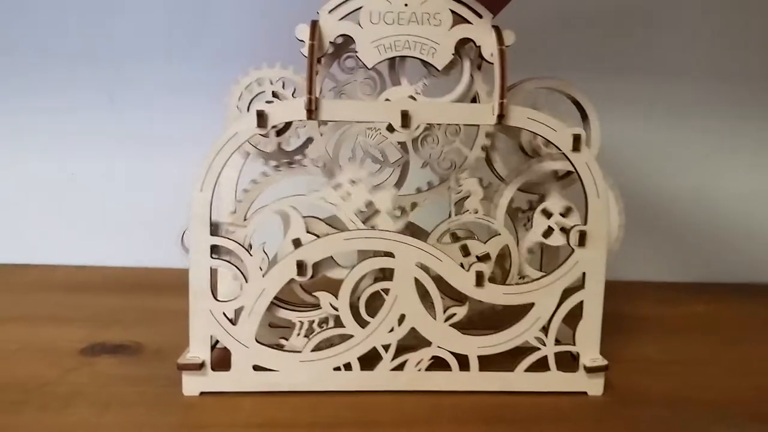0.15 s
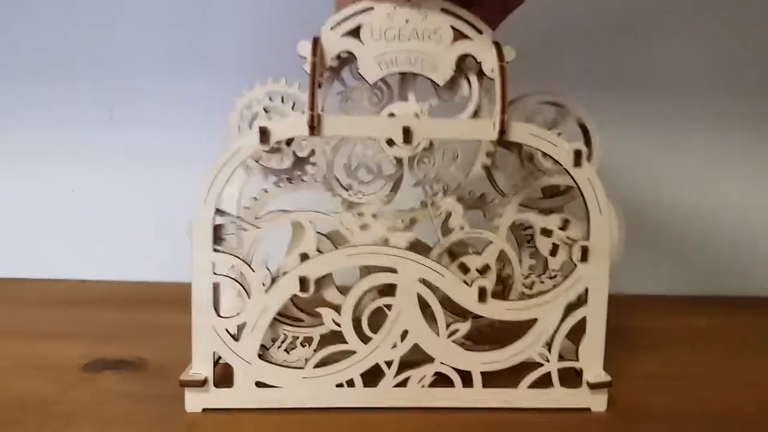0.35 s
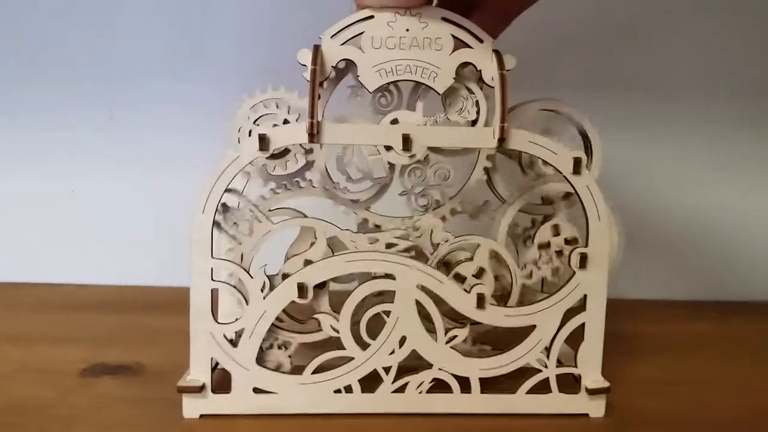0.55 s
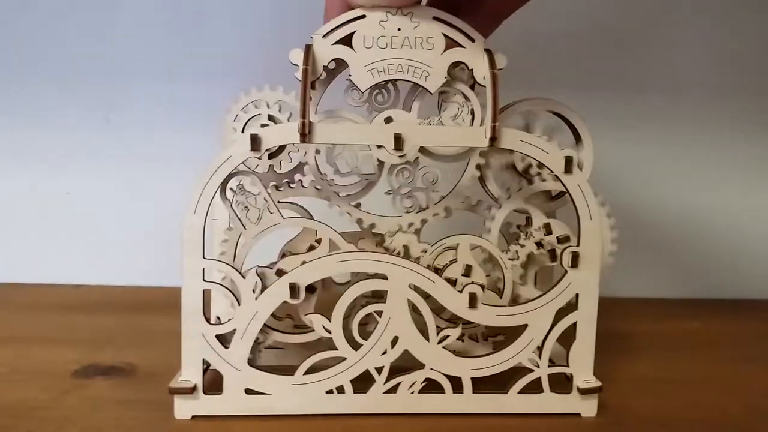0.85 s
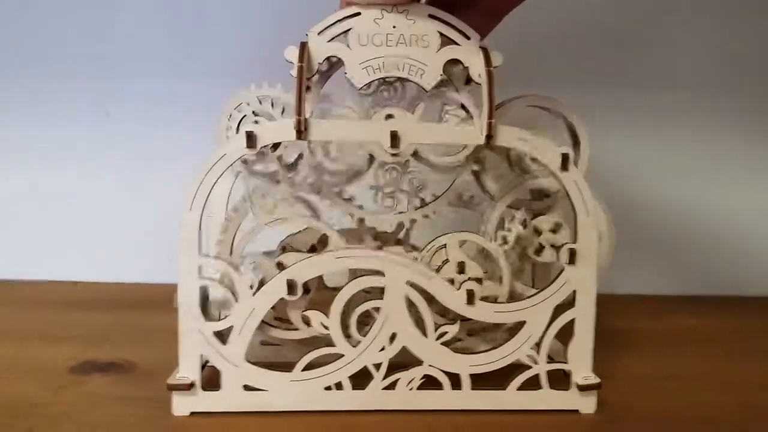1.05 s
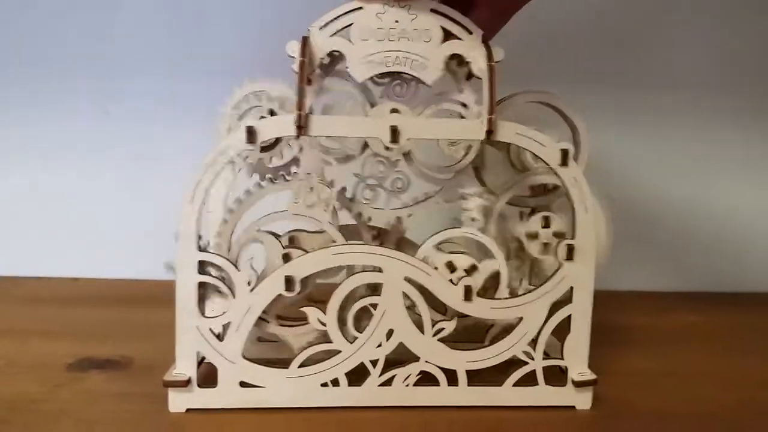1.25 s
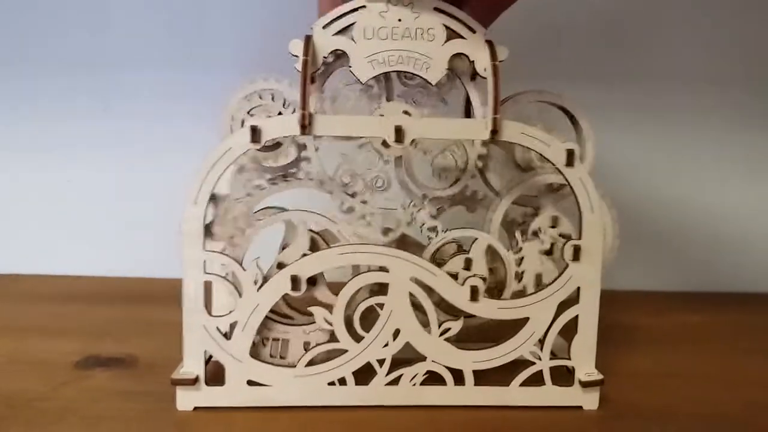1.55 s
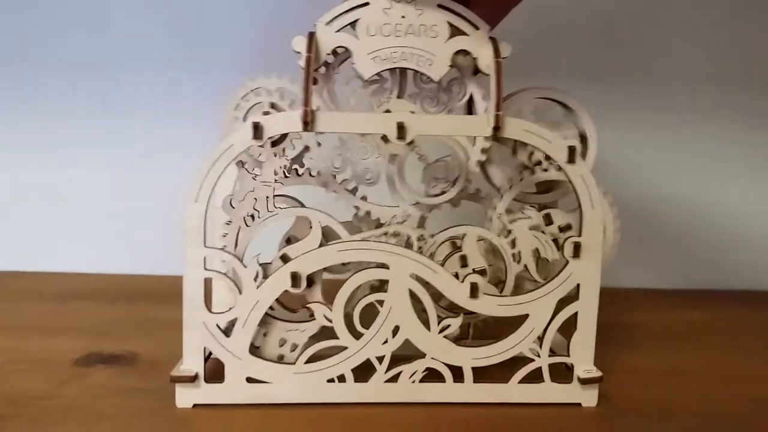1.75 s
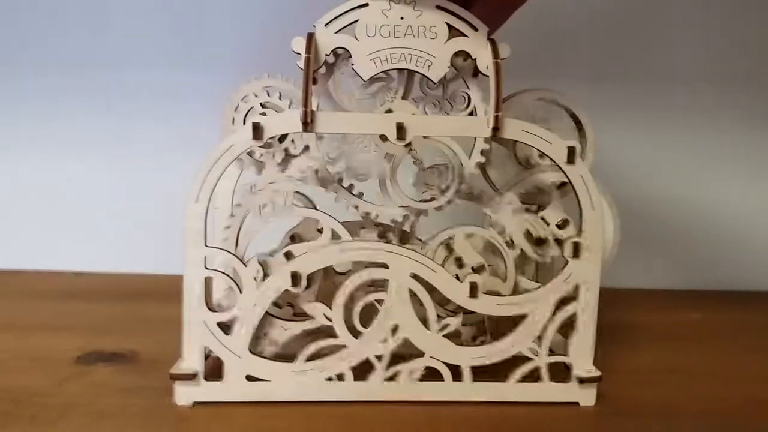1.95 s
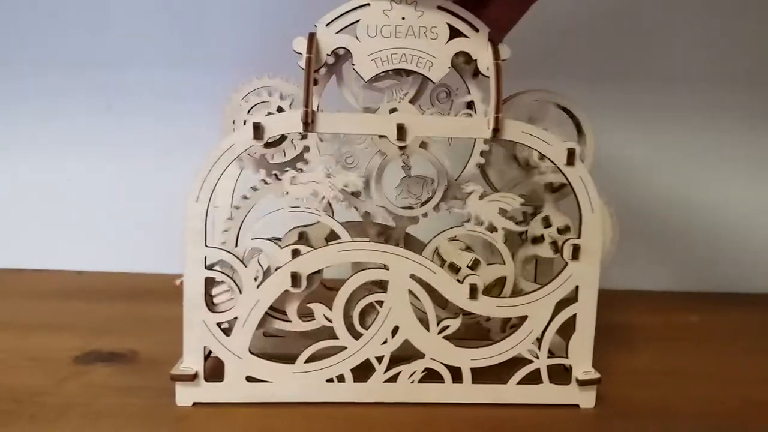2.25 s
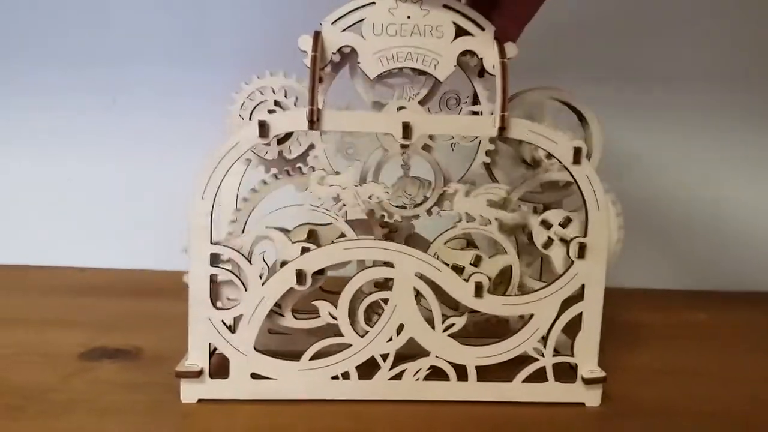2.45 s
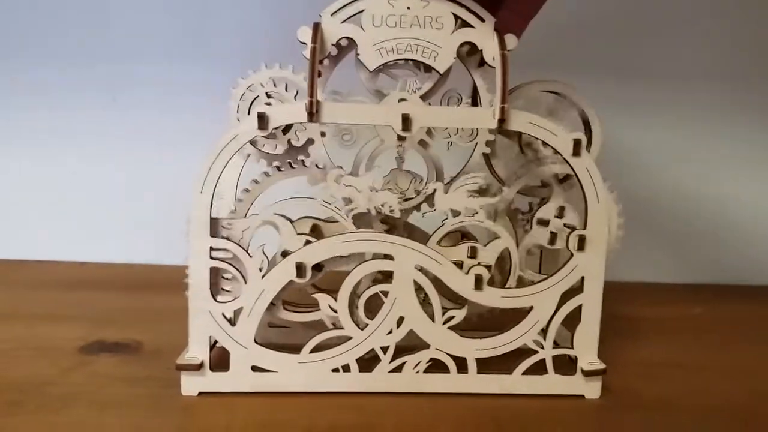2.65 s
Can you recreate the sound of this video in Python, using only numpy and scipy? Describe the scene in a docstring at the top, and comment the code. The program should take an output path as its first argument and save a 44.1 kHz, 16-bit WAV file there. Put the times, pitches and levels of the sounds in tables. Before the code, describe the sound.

A small wooden gear mechanism turns indoors, ticking, scraping and knocking over a faint low hum.

```python
"""Hand-turned wooden gears

Plywood gears of a table-top model turn in a quiet room. Teeth tick as bursts of coloured noise; rubbing and
knocks ring the resonances of the thin frame; an axle squeaks as short sine notes. Dull decaying tones bump
the table, and distant machinery hums as three fuzzy tones over the shaped noise of two unequal microphones."""
import sys
import numpy as np
from scipy import signal
from scipy.fft import irfft
from scipy.io import wavfile
from scipy.ndimage import uniform_filter1d

SR = 44100
rng = np.random.default_rng(int(sys.argv[2]) if len(sys.argv) > 2 else 0)


def generate_wav(signal):
    """Clip the signal to [-1, 1] and save it as 16-bit WAV at the path in sys.argv[1]."""
    frames = np.transpose(np.atleast_2d(signal))
    scaled = np.clip(frames, -1, 1) * 32767
    pcm = np.round(scaled).astype(np.int16)
    wavfile.write(sys.argv[1], SR, pcm)


N = 123039  # length in samples
LOW_RIGHT_DB = -18.5  # hum and thumps are this much weaker on the right


def gain_of(db):
    """Turn decibels into a factor for the waveform."""
    return 10 ** (np.asarray(db) / 20)


def evened(x):
    """Scale a signal to an average (RMS) strength of 1."""
    return x / np.sqrt(np.mean(x ** 2) + 1e-20)


def over_pitch(table, hz):
    """Read the columns of a table at the given frequencies, on a logarithmic scale."""
    table_hz, *columns = np.transpose(table)
    return np.array([np.interp(np.log(hz + 1), np.log(table_hz + 1), c) for c in columns])


def over_time(table):
    """Glide through the columns of a table over time."""
    seconds, *columns = np.transpose(table)
    return np.array([np.interp(np.arange(N) / SR, seconds, c) for c in columns])


def resonate(x, hz, width):
    """A resonance of gain 1 whose pitch may move: shift it to 0 Hz, smooth, and shift it back."""
    turn = np.exp(2j * np.pi * np.cumsum(hz * np.ones(len(x))) / SR)
    keep = np.exp(-np.pi * width / SR)
    return 2 * (turn * signal.lfilter([1 - keep], [1, -keep], x / turn)).real


# Microphone hiss. Each row: frequency in Hz, left level in dB per Hz, right level in dB per Hz.
HISS_LEVELS = [(26.5, -90, -105), (45.4, -54, -72.5), (94.5, -63, -69), (186, -72.5, -79.5),
               (302, -82.5, -87.5), (775, -97, -95.5), (1130, -91, -101.8), (2100, -99.5, -105.3),
               (2580, -102.9, -108.3), (3370, -95, -107.1), (4104, -82.5, -107.4), (5074, -97.5, -114.5),
               (5700, -112.6, -122.9), (8300, -123.3, -125.3), (10300, -115.3, -117.4),
               (14900, -110.2, -110.9)]
# How alike the two sides are. Each row: frequency in Hz, likeness from 0 (unrelated) to 1 (the same).
HISS_LIKENESS = [(60, 1), (150, 0.54), (500, 0.1), (1200, 0.013)]


def hiss():
    """Steady noise with its own spectrum on each side, shared between the sides only in the bass."""
    frames, hz = N // 512 + 5, np.fft.rfftfreq(2048, 1 / SR)
    a, b, c, d = rng.standard_normal((frames, 1025, 4)).T
    left, other = a + 1j * b, c + 1j * d
    same = np.clip(over_pitch(HISS_LIKENESS, hz)[0], -1, 1)[:, None]
    right = same * left + np.sqrt(1 - same ** 2) * other
    spectrum = np.array([left, right]) * gain_of(over_pitch(HISS_LEVELS, hz)[:, :, None])
    spectrum *= np.sqrt(SR / 2048)  # from level per Hz to level per frequency bin
    return signal.istft(spectrum, nperseg=2048, noverlap=1536)[1][:, :N]


# Machinery hum. Each row: time in seconds, pitch of the low tone in Hz, then the levels of the low,
# middle and top tones in dB.
HUM_COURSE = [(0, 69, -47, -35.5, -52), (.22, 70, -40.5, -54.5, -53.5), (.4, 69.5, -56, -73, -53),
              (.56, 59.63, -37, -59, -43.5), (1.05, 57.4, -36, -43, -44.5), (1.2, 57.4, -34.5, -49, -56.5),
              (1.65, 57.3, -34, -46.5, -42), (2.1, 57, -38.5, -45, -39.5), (2.4, 57, -48.5, -45, -47),
              (2.79, 57, -39.5, -53.5, -41)]
MID_HZ, TOP_RATIO = 121.04, 2.63  # fixed middle pitch; top pitch as a multiple of the low one
HUM_WIDTH_HZ, HUM_FUZZ = 7, .55  # width of the noise around each tone; its share next to the sine


def hum():
    """Three low tones, each a sine with a fuzzy skirt; the top one follows the pitch of the lowest."""
    low_hz, *levels = over_time(HUM_COURSE)
    out = np.zeros(N)
    for hz, db in zip((low_hz, MID_HZ, TOP_RATIO * low_hz), levels):
        cycles = np.cumsum(hz * np.ones(N)) / SR + rng.random()
        tone = np.sqrt(2) * np.sin(2 * np.pi * cycles)
        fuzz = resonate(rng.standard_normal(N), hz, HUM_WIDTH_HZ)
        fuzz = evened(resonate(fuzz, hz, 3 * HUM_WIDTH_HZ))
        out += gain_of(db) * evened(tone + HUM_FUZZ * fuzz)
    return out * gain_of([[0], [LOW_RIGHT_DB]])


# Frame resonances in three groups: low, middle and upper. Each row: frequency in Hz, width in Hz,
# left gain in dB, right gain in dB.
FRAME_MODES = [
    [(390, 36, 4, -5), (239, 110, 2.5, -11), (477, 20, -4, -7.5), (625, 128, -5, -15.5)],
    [(895.4, 38, -4, -6), (1032, 44.4, 4, -7)],
    [(1530, 60, 5.5, -6), (1361, 150, 2, -7), (1907, 256, 4, -7), (2134, 146, 1, -4.5),
     (2950, 470, 0.5, -15), (3900, 400, -3, -18)],
]
# Teeth binding and slipping. Each row: loudest moment in seconds, then the level of the jolts in the low,
# middle and upper groups in dB.
SCRAPE_LEVELS = [(0.026, -52, -60, -58), (0.057, -58, -56.5, -61.5), (0.113, -57, -69, -65.5),
                 (0.176, -58, -59.5, -60), (.21, -78, -60.5, -67), (0.494, -59, -61, -60),
                 (0.988, -53.5, -58, -59), (1.16, -54.5, -57, -62.5), (1.214, -54, -54.5, -60),
                 (1.284, -54.5, -54.5, -62.5), (1.368, -56, -58.5, -58), (1.476, -58.5, -62.5, -64),
                 (1.543, -49.5, -58.5, -60.5), (1.65, -60, -60, -67.5), (1.704, -59.5, -58, -64.5),
                 (1.794, -54, -57.5, -58), (2.027, -55.5, -56, -67), (2.137, -57.5, -62.5, -65),
                 (2.285, -56, -72, -60)]
# Hard knocks of a wheel on the frame. Each row: time in seconds, strength at 1 kHz in dB,
# brightness in dB per octave.
WHEEL_CLACKS = [(0.487, -7.5, -55), (0.968, -14, 5), (1.47, -2, -14), (1.989, -6.5, -18), (2.018, -8, -26),
                (2.278, -11.5, -2)]
SCRAPE_S, RING_LAG_S = 0.019, 0.0065  # spread of a scrape; its jolts come this much ahead of its loudest moment
STEADY_RUB_DB = [-63.5, -70.5, -75]  # constant rubbing in the low, middle and upper groups
SLIPS_PER_S, SLIP_SPREAD_DB = 1500, 2  # how often jolts come, and how much their strength varies
WANDER = .011  # random drift of each resonance, as a fraction of its pitch


def rubbing():
    """Stick-slip jolts ring the flexing frame, faintly all along and harder in scrapes; clacks strike it too."""
    out, t = np.zeros((2, N)), np.arange(N) / SR + RING_LAG_S
    clack_s, clack_db, tilt = np.transpose(WHEEL_CLACKS)
    clack_at = np.round(clack_s * SR).astype(int)
    for k, modes in enumerate(FRAME_MODES):
        power = gain_of(STEADY_RUB_DB[k]) ** 2
        for s, *db in SCRAPE_LEVELS:
            power = power + gain_of(db[k]) ** 2 * np.exp(-((t - s) / SCRAPE_S) ** 2)
        for hz, width, *sides_db in modes:
            strength = gain_of(SLIP_SPREAD_DB * np.minimum(rng.exponential(1, N), 2))
            slips = (rng.random(N) < SLIPS_PER_S / SR) * strength
            slips = evened(slips * rng.choice([-1., 1.], N))  # jolts go either way
            slips *= np.sqrt(power * SR / width / 4)  # make up for the narrowness of the resonance
            if k > 0:  # clacks spare the low group
                slips[clack_at] += gain_of(clack_db + tilt * np.log2(hz / 1000))
            drift = np.interp(t, np.linspace(0, t[-1], 40), rng.standard_normal(40))
            moving_hz = hz * (1 + WANDER * drift)
            rung = resonate(resonate(slips, moving_hz, width), moving_hz, 3 * width)
            out += gain_of(sides_db)[:, None] * rung
    return out


# Teeth snapping home. Each row: time in seconds, crack level in dB, ring level against the crack in dB.
TOOTH_TICKS = [(0.0045, -50, -21), (0.0131, -35, -4.5), (0.047, -45.5, -11), (0.078, -60, -19),
               (0.1059, -47, -6), (0.1313, -49.5, -12), (0.162, -50, -5), (0.182, -43.5, -6),
               (0.192, -42, -9), (0.27, -49, -8.5), (0.364, -52.5, -8.5), (0.4485, -51, -13),
               (0.493, -41.5, -13), (0.607, -50.5, -15), (0.6374, -48.5, -31), (0.718, -58, -5),
               (0.966, -47, -3), (0.9595, -58, -9), (0.9784, -55, -4), (0.987, -40, -25), (0.991, -39, -19),
               (1.061, -54, -5), (1.101, -54, -19), (1.128, -45, -6), (1.1538, -48, -20),
               (1.174, -37.5, -21), (1.192, -37.5, -18), (1.2081, -37.5, -9.5), (1.224, -39, -24),
               (1.2404, -39, -6), (1.2547, -39, -13), (1.2737, -40, -6.5), (1.328, -43, -27),
               (1.349, -43.5, -6), (1.364, -41.5, -13), (1.4137, -38.5, -14), (1.4311, -42.5, -8),
               (1.463, -39.5, -8), (1.5099, -34.5, -22), (1.521, -45, -17), (1.5877, -43.5, -34),
               (1.647, -50, -15), (1.6666, -47, -18), (1.754, -47, -34), (1.779, -50, -17),
               (1.791, -38.5, -20), (1.878, -51, -10), (1.915, -48.5, -13), (1.984, -44.5, -9),
               (2.0123, -39.5, -18), (2.0405, -55, -8), (2.1309, -45.5, -12), (2.3, -46.5, -9),
               (2.5044, -47, -12)]
# Tone colour of the crack. Each row: frequency in Hz, left gain in dB, right gain in dB.
CRACK_COLOUR = [(1460, -3.5, -23), (2900, -5.5, -5.5), (4180, 4, -7.5), (5760, -7, -16), (7700, -12, -13.5),
                (10140, -2.5, -9), (12000, -0.5, -4), (15000, -4, -12)]
RISE_S, SNAP_S, CHATTER_S, CHATTER_DB = 0.0013, 0.0027, 0.014, -5.5  # onset, snap, and chatter after it
RING_HZ, RING_WIDTH_HZ, RING_RIGHT_DB = 6480, 1630, -31
FAINT_PER_S, FAINT_DB, FAINT_RING_DB = 40, -66, -5  # weak random ticks: rate, lowest level, ring against crack
COLOUR_DB = 4  # how strongly the tone colour varies


def ticks():
    """Each tooth gives a noisy snap with chatter and a high ring; weak ticks fall at random throughout."""
    t = np.arange(round(.08 * SR)) / SR
    fade = np.exp(-(t / SNAP_S) ** 2) + gain_of(CHATTER_DB) * np.exp(-t / CHATTER_S)
    shape = np.minimum(t / RISE_S, 1) * fade

    # place the ticks as power, so that overlapping noises add up correctly
    faint = (rng.random(N) < FAINT_PER_S / SR) * gain_of(FAINT_DB + 2 * rng.exponential(1, N))
    crack, ring = faint ** 2, (faint * gain_of(FAINT_RING_DB)) ** 2
    for s, db, ring_db in TOOTH_TICKS:
        crack[round(s * SR)] += gain_of(db) ** 2
        ring[round(s * SR)] += gain_of(db + ring_db) ** 2
    crack, ring = (np.sqrt(abs(signal.oaconvolve(p, shape ** 2)[:N])) for p in (crack, ring))

    noise, hz = rng.standard_normal((2, N)), np.fft.rfftfreq(512, 1 / SR)
    colour = np.roll(irfft(gain_of(over_pitch(CRACK_COLOUR, hz))), 256, 1) * np.hanning(512)
    out = signal.oaconvolve(crack * noise, colour, "same", axes=1)

    # random patches in time and pitch, so that each tooth favours other bands
    spectrum = signal.stft(out, nperseg=128)[2]
    patches = rng.standard_normal(spectrum.shape[:0:-1])
    patches = uniform_filter1d(uniform_filter1d(patches, 8, 0), 6, 1)
    patches = evened(patches).T
    spectrum = spectrum * gain_of(COLOUR_DB * (patches - .5))
    out = signal.istft(spectrum, nperseg=128)[1][:, :N]

    for k, db in enumerate((0, RING_RIGHT_DB)):
        rung = resonate(ring * noise[k], RING_HZ, RING_WIDTH_HZ)
        rung = resonate(rung, RING_HZ, RING_WIDTH_HZ)
        out[k] += gain_of(db) * np.sqrt(SR / RING_WIDTH_HZ / 4) * rung
    return out


# Dull bumps through the table top. Each row: start in seconds, height of the swell on the left in dB.
TABLE_THUMPS = [(0.104, -31.5), (0.589, -33), (1.59, -36.5)]
THUMP_HZ, THUMP_S = 193.4, 0.0034  # pitch, and time until the swell is highest


def thumps():
    """The model rocks and bumps the table top: a low push of about two cycles."""
    out, t = np.zeros(N), np.arange(N) / SR
    for s, db in TABLE_THUMPS:
        since = np.maximum(t - s, 0)
        swell = since / THUMP_S * np.exp(1 - since / THUMP_S)
        out += gain_of(db) * swell * np.sin(2 * np.pi * THUMP_HZ * since)
    return out * gain_of([[0], [LOW_RIGHT_DB]])


# Axle squeaks. Each row: start in seconds, length in seconds, pitch in Hz, level in dB.
AXLE_SQUEAKS = [(0.45, 0.026, 1571, -49), (0.572, 0.039, 1750, -50.5), (0.713, 0.023, 1496, -56),
                (1.856, 0.024, 2624, -50.5)]
SQUEAK_RIGHT_DB = -7


def squeaks():
    """An axle binds and sings a short pure note that swells and fades."""
    out, t = np.zeros(N), np.arange(N) / SR
    for s, length, hz, db in AXLE_SQUEAKS:
        swell = np.sin(np.pi * np.clip((t - s) / length, 0, 1))
        out += gain_of(db) * swell * np.sin(2 * np.pi * hz * t)
    return out * gain_of([[0], [SQUEAK_RIGHT_DB]])


ROOM_T60_S = 0.42  # time in which the reflections die down by 60 dB
ROOM_DB, RIGHT_DIRECT_DB = [-11.5, -6], -7.5  # reflections left and right; direct sound on the right


def room(x):
    """A short tail of reflections; the right microphone faces away and hears more of it."""
    t = np.arange(round(.3 * SR)) / SR
    tail = rng.standard_normal((2, len(t))) * gain_of(-60 * t / ROOM_T60_S) * (t > .002)
    wet = signal.fftconvolve(x, tail / np.linalg.norm(tail[0]), axes=1)[:, :N]
    direct = x * gain_of([[0], [RIGHT_DIRECT_DB]])
    return direct + gain_of(ROOM_DB)[:, None] * wet


RIGHT_LEAD_S = 0.00017  # the gears reach the right microphone this much earlier


def scene():
    """Put the gears in the room, then add the thumps, the hum and the hiss."""
    gears = room(rubbing() + ticks() + squeaks())
    lead = round(RIGHT_LEAD_S * SR)
    gears[0] = np.pad(gears[0], (lead, 0))[:N]
    return gears + thumps() + hum() + hiss()


RUMBLE_CUT_HZ, EDGE_HZ = 44.2, 15780  # lower and upper limits of the recorder


def record(dry):
    """The recorder rolls off the deep bass and cuts the highest treble."""
    bass_cut = signal.butter(2, RUMBLE_CUT_HZ, "high", fs=SR, output="sos")
    treble_cut = signal.firwin(1023, EDGE_HZ, window=("kaiser", 9), fs=SR)
    return signal.oaconvolve(signal.sosfilt(bass_cut, dry), treble_cut[None], "same")


dry = scene()
out = record(dry)
generate_wav(out)
```